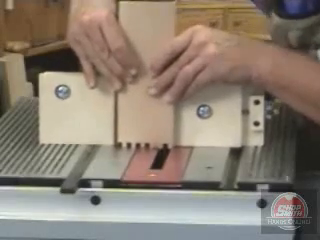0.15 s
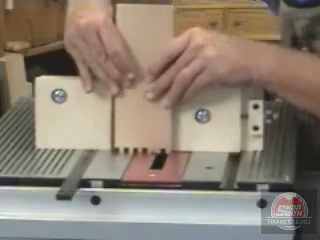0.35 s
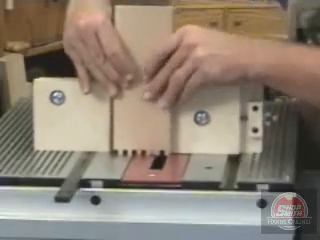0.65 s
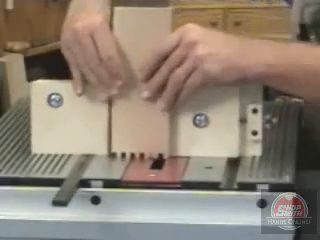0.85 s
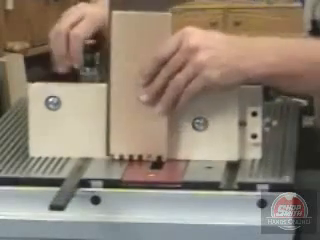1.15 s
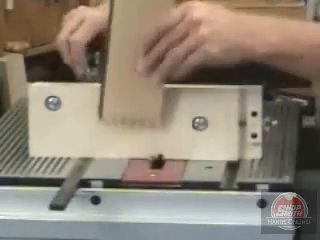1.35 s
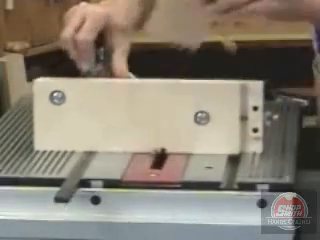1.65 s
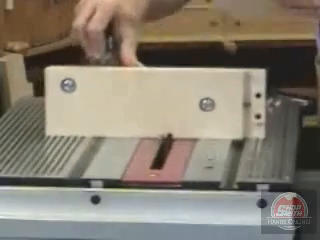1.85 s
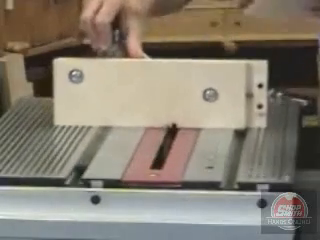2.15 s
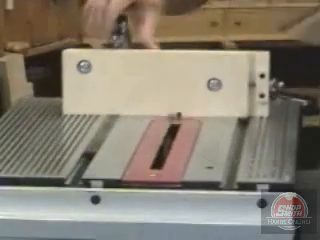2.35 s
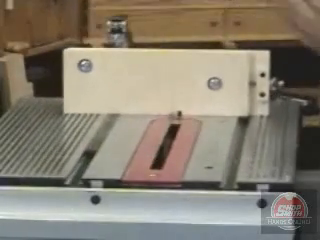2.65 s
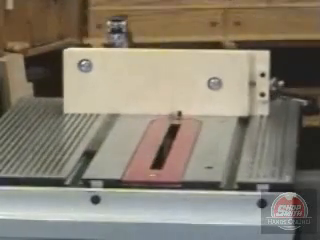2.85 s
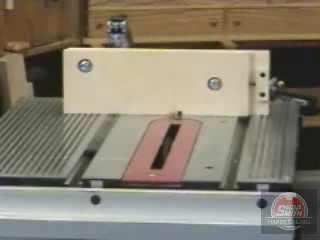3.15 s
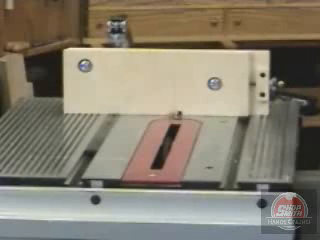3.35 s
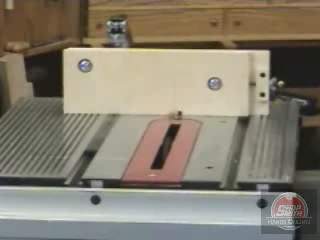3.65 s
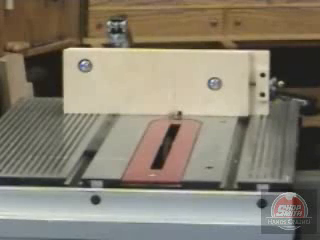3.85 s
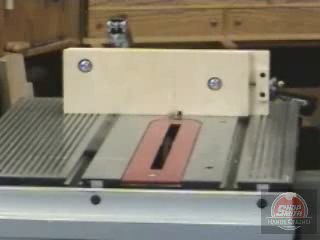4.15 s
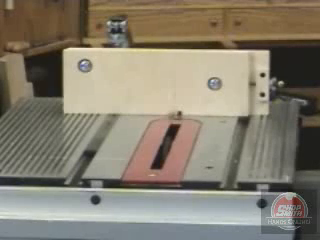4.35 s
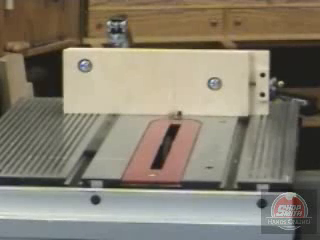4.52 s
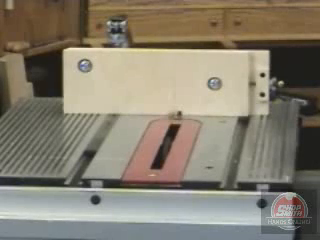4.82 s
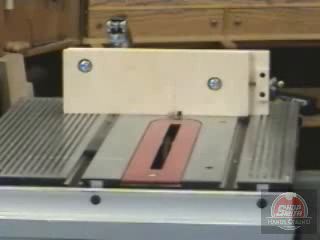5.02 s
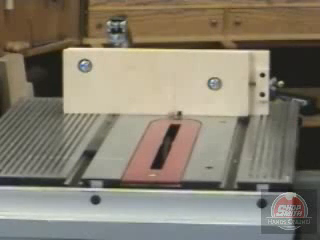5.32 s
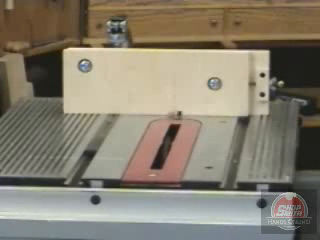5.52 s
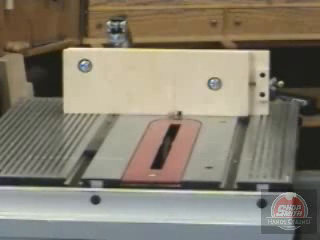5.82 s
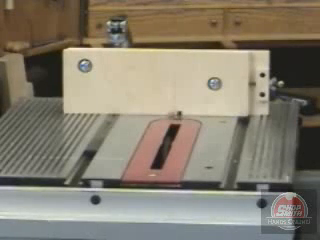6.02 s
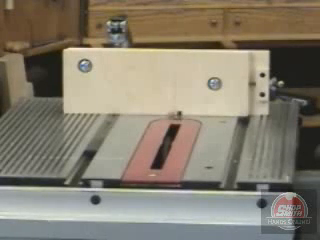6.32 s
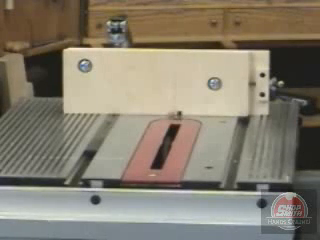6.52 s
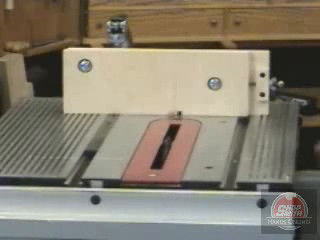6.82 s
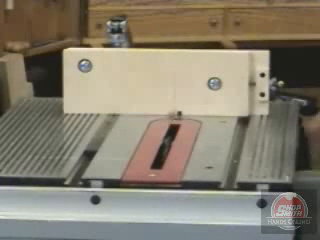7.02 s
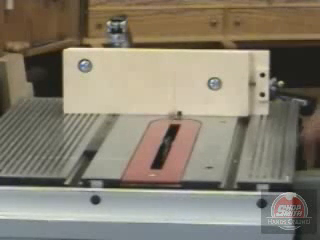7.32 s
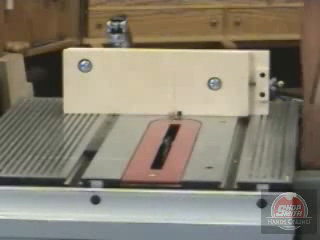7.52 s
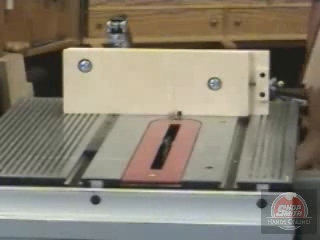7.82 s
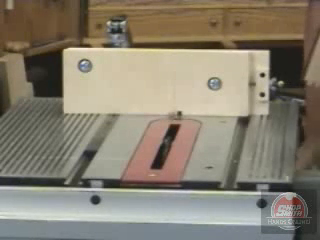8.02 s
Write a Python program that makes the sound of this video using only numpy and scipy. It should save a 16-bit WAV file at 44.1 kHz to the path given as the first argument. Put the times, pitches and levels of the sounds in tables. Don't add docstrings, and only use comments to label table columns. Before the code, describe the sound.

A table saw finishes a cut with a raspy hiss, wood knocks twice, then the blade whine sinks and rattles over a dust extractor's steady hum.

```python
import sys
import numpy as np
from scipy import signal
from scipy.io import wavfile
from scipy.ndimage import uniform_filter1d

SR = 44100
rng = np.random.default_rng(int(sys.argv[2]) if len(sys.argv) > 2 else 0)


def amplitude_ratio(level_db):
    exponent = np.asarray(level_db, float) / 20
    return 10 ** exponent


def store_pcm(level_fs):
    pcm = np.round(np.clip(level_fs, -1, 1) * 32767).astype(np.int16)
    wavfile.write(sys.argv[1], SR, np.atleast_2d(pcm).T)


N = 360297
HZ = np.fft.rfftfreq(2048, 1 / SR)
FRAMES = np.arange(N // 512 + 5) * 512 / SR

SHAFT_HZ = 59.16
EXTRACTOR_DB = -22.5
VANE_WAVER_DB = 2.5
# frequency in Hz, density in dB per Hz.
ROAR_COLOUR = [(35, -47.5), (60, -13), (184, -13), (239, -16), (281, -14.5), (522, -5), (749, -9.5),
               (1030, -15), (1120, -11.5), (1540, -16), (2640, -34.5), (4280, -56.5), (5330, -56),
               (7200, -53), (9360, -92), (15800, -120)]
# shaft order, level in dB.
SHAFT_HUM = [(1, -51), (2, -39.5), (3, -39.5), (4, -30.5), (5, -44.5), (7, -39), (16, -46.5)]
# centre in Hz, width in Hz, level in dB.
DUCT_MODES = [(192, 42, -43), (372.6, 43, -33), (467.1, 32, -34.5), (525, 34, -35), (605.7, 18, -36),
              (1036, 90, -37)]
# time in seconds, level in dB.
VANE_LOAD = [(0, -29.5), (.8, -34), (1.9, -38.5), (2.3, -28.5), (4.9, -28), (5.3, -36), (5.7, -28),
             (6.7, -29.5), (8.17, -53)]

RUMBLE_DB, LUMPS_DB = -54.5, 7

KNOCK_T60_S = .03
# time in seconds, peak in dB.
WOOD_TICKS = [
    (0.197, -59),
    (1.9554, -45),
    (6.795, -18),
]
# time in seconds, peak in dB, pitch in Hz.
WOOD_KNOCKS = [
    (.197, -10, 900),
    (1.9575, -7, 650),
]
# start in seconds, length in seconds, level in dB.
RUBBING = [
    (4.705, 0.19, -32.5),
    (4.896, 0.11, -39),
    (5.169, 0.32, -37.5),
    (5.5, .2, -43.5),
    (6.043, .22, -45),
]
# time in seconds, peak in dB, pitch in Hz.
RATTLES = [(4.7168, -24, 2530), (4.7386, -15.5, 2840), (4.7587, -44, 2920), (4.789, -21.5, 2900),
           (4.8143, -21, 2930), (4.8394, -38, 2480), (4.8698, -39, 3100), (4.9286, -21.5, 2830),
           (4.9646, -31.5, 2550), (4.9912, -25, 2820), (5.1907, -24, 2710), (5.214, -37.5, 2390),
           (5.2729, -19.5, 2580), (5.2888, -35, 2690), (5.319, -23.5, 2860), (5.3344, -36, 2420),
           (5.376, -26, 3080), (5.4125, -29, 3030), (5.5727, -37, 3020), (5.7718, -44, 2500),
           (6.0604, -35, 2920), (6.1194, -45, 2980), (6.1644, -31.5, 2840), (6.2143, -37, 2440)]

CUT_PEAK_S, CUT_END_S = .09, 0.22
TOOTH_HZ, OFF_S, COAST_S = 1163.5, 3.22, 2.3
IMBALANCE_DB, IMBALANCE_SAG_DB_PER_S, IMBALANCE_END_S = -29, 2.5, 2.7
# time in seconds, level in dB.
TOOTH_WHINE = [(0, -27), (.9, -31), (1.2, -48), (2.2, -42.5), (2.5, -34.5), (3.25, -26), (3.8, -31),
               (4.0, -44), (5, -56)]
# frequency in Hz, density in dB per Hz.
BLADE_COLOUR = [(150, -38.5), (250, -4), (260, -24.5), (286, 1), (328, -5), (380, -6), (441, -3),
                (518, 0.5), (889, -6.5), (1130, -5), (1230, -7), (2520, -14.5), (4090, -21.5),
                (5430, -26.5), (6300, -35.5), (8190, -67), (13900, -120)]
# lower edge in Hz, upper edge in Hz.
REGION_EDGES = [(300, 750), (800, 1300), (1400, 2000), (2100, 2900), (3100, 4400), (4600, 6400)]
# idle level in dB, share of the wind, lift while cutting in dB,
# fade of that lift in seconds, share of the slides.
REGION_MOVES = [
    (-19, .55, 1.7, .3, 0.11),
    (-18, 0.95, 2.5, 0.37, 0.13),
    (-21.5, 1.0, 5.5, 0.55, -0.2),
    (-27, 0.97, 7, 0.45, 0.2),
    (-37.5, 0.9, 11, 0.042, 0.7),
    (-47, 0.72, 6.5, 0.12, 1.16),
]
# time in seconds, level in dB relative to idling.
BLADE_WIND = [(0, -0.5), (2.3, 0), (2.6, 1.5), (3.5, 0), (4.0, -1), (5.2, -9.5), (6.2, -14.5),
              (8.17, -17.5)]
# start in seconds, length in seconds, level in dB.
SLED_SLIDES = [
    (0.552, 1.8, 7),
    (2.396, .5, -2.5),
    (3.406, .45, 4),
    (3.898, .7, 2),
]

LOUD_DB, QUIET_DB = -16, -21
EDGE_LOUD_DB, EDGE_QUIET_DB, EDGE_JUMP_DB = -63, -73.5, 3.5
TOP_DB = -77.5
FILL_DB = -14
REFILL = .85
# lower edge in Hz, upper edge in Hz, step over band level in dB when loud,
# the same when quiet, spread of the step in dB, level jumps in dB, least loudness relative to the whole in dB.
TRACK_BANDS = [(0, 52, -2, -6, 2, 0, -35), (52, 95, 1, -6, 3, 0, -28), (1500, 2000, 1, 6, 3, 0, -60),
               (2000, 2700, 4, 8, 3, 1, -60), (2700, 3150, 6, 5, 3, 2, -60),
               (3150, 3700, 9, 11.5, 2.5, 1.8, -60), (3700, 4400, 10, 12, 2.5, 1.8, -60),
               (4400, 5300, 10, 10, 3, 1.8, -60), (5300, 6050, 6, 5, 3, 1.8, -60),
               (6050, 6400, 5, 3, 5, 2.5, -60), (6400, 7300, 4, -6, 3, 0, -48.5),
               (7300, 8000, 12, 14.5, 2, 0, -90)]
# frequency in Hz, level in dB.
MIRROR = [(8000, -0.5), (9000, -4.5), (9950, -13)]
# start in seconds, length in seconds, level in dB.
BASS_LULLS = [(.12, .78, -12), (1.02, .06, -6), (1.6, .2, -10), (1.88, 0.11, -12), (2.25, .28, -12),
              (2.658, .12, -7), (2.92, .56, -13), (3.97, 0.12, -15), (4.305, .2, -4), (6.482, .06, -3)]
# start in seconds, length in seconds, level in dB.
EDGE_STARVED = [(0.076, 0.45, -12), (0.732, 0.22, -6), (1.136, 0.14, -18), (1.398, .15, -25),
                (1.657, 0.062, -15), (1.865, 0.46, -22.5), (2.585, 0.076, -16), (2.99, .22, -7),
                (3.44, 0.064, -25), (3.58, .1, -12), (3.95, 0.21, -15)]
# time in seconds, peak in dB.
STRAY_CHIRPS = [(0.0842, -53), (0.2794, -64), (0.3744, -61), (0.5147, -59), (0.6064, -62), (0.6898, -60),
                (0.7454, -61), (0.7846, -61), (1.0244, -60), (1.1373, -55), (1.1644, -54), (1.3648, -56),
                (1.3994, -57), (1.4424, -54), (1.6601, -60), (1.7699, -64), (1.9094, -63), (2.0253, -49),
                (2.0557, -53), (2.0894, -54), (2.1344, -63), (2.1824, -56), (2.9294, -62), (3.4194, -63),
                (3.5344, -61), (3.6351, -66), (4.2133, -68), (4.8144, -74), (7.1442, -73), (7.6939, -76)]


def read(points, hz):
    f, value = np.transpose(points)
    return np.interp(np.log(hz + 1), np.log(f + 1), value)


def curve(rows):
    s, db = np.transpose(rows)
    return amplitude_ratio(np.interp(np.arange(N) / SR, s, db, left=-200, right=-200))


def spell(start, length, edge_s):
    t = np.arange(N) / SR
    return np.clip(np.minimum(t - start, start + length - t) / edge_s + .5, 0, 1)


def spells(rows, edge_s):
    return sum(db * spell(s, length, edge_s) for s, length, db in rows)


def evened(x):
    return x / np.sqrt(np.mean(x ** 2) + 1e-20)


def drift(rate):
    grit = uniform_filter1d(rng.standard_normal(N), size=400)
    return evened(signal.lfilter([1], [1, -np.exp(-2 * np.pi * rate / SR)], grit))


def resonate(x, hz, width):
    turn = np.exp(2j * np.pi * np.cumsum(hz * np.ones(len(x))) / SR)
    r = np.exp(-np.pi * width / SR)
    return 2 * (turn * signal.lfilter([1 - r], [1, -r], x / turn)).real


def noise(db, patchy_db, flicker_db):
    a, b, patches = rng.standard_normal((len(FRAMES), len(HZ), 3)).T
    patches = uniform_filter1d(patches, size=18, axis=0)
    patches = evened(uniform_filter1d(patches, size=7, axis=1))
    flicker = evened(uniform_filter1d(rng.standard_normal(len(FRAMES)), size=3))
    flicker = np.outer(np.clip((HZ - 2500) / 1500, 0, 1), flicker)
    gain = amplitude_ratio(db + patchy_db * patches + flicker_db * flicker)
    z = (a + 1j * b) * gain * np.sqrt(SR / 2048)
    return signal.istft(z, nperseg=2048, noverlap=1536)[1][:N] * .87


def rumble():
    floor = resonate(resonate(rng.standard_normal(N), 35, 30), 35, 30)
    return amplitude_ratio(RUMBLE_DB + LUMPS_DB * drift(8.7)) * evened(floor)


def extractor():
    turns = 2 * np.pi * SHAFT_HZ * np.arange(N) / SR
    hum = np.zeros(N)
    for order, db in SHAFT_HUM:
        tone = np.sin(round(order) * turns + 2 * np.pi * rng.random())
        hum += np.sqrt(2) * amplitude_ratio(db + 1.54 * drift(6.9)) * tone
    vanes = np.sin(8 * turns + 0.68 * drift(4.1))
    hum += np.sqrt(2) * curve(VANE_LOAD) * amplitude_ratio(VANE_WAVER_DB * drift(3)) * vanes
    air = noise(read(ROAR_COLOUR, HZ)[:, None], patchy_db=1.0, flicker_db=0)
    roar = amplitude_ratio(EXTRACTOR_DB - 4.5) * evened(air)
    ducts = np.zeros(N)
    for hz, width, db in DUCT_MODES:
        ducts += amplitude_ratio(db) * evened(resonate(resonate(rng.standard_normal(N), hz, width), hz, width))
    return hum + roar + ducts


def ticks():
    out = np.zeros(N)
    for s, db in WOOD_TICKS:
        out[round(s * SR)] = amplitude_ratio(db - 4)
    return np.convolve(out, signal.firwin(101, [6300, 9800], pass_zero=False, fs=SR), "same")


def knocks():
    out, t = np.zeros(N), np.arange(3000) / SR
    for s, db, hz in WOOD_KNOCKS:
        modes = np.sin(2 * np.pi * hz * t) + .6 * np.sin(2 * np.pi * 1.7 * hz * t)
        out[round(s * SR):][:len(t)] += amplitude_ratio(db - 60 * t / KNOCK_T60_S) * modes
    return out


def rub():
    plate = resonate(resonate(rng.standard_normal(N), 2870, 600), 2870, 600)
    gain = sum(amplitude_ratio(db - 4) * spell(s, length, 0.034) for s, length, db in RUBBING)
    return gain * evened(plate * amplitude_ratio(4.1 * drift(22)))


def chatter():
    out, t = np.zeros(N + SR), np.arange(1200) / SR
    shape = (t / 0.0085 * np.exp(1 - t / 0.0062)) ** 2
    for s, db, hz in RATTLES:
        grit = rng.standard_normal(len(t))
        scrape = evened(resonate(resonate(grit, hz, 550), hz, 550))
        ring = np.sin(2 * np.pi * hz * t) + .9 * scrape
        out[round(s * SR):][:len(t)] += amplitude_ratio(db) * shape * ring
    return out[:N]


def whine():
    t = np.arange(N) / SR
    hz = TOOTH_HZ * np.exp(-np.maximum(t - OFF_S, 0) / COAST_S)
    fuzz = evened(resonate(rng.standard_normal(N), hz, 9))
    imbalance = amplitude_ratio(IMBALANCE_DB - IMBALANCE_SAG_DB_PER_S * t + 1.5 * drift(1.2))
    imbalance = imbalance * spell(-1, 1 + IMBALANCE_END_S, .2)
    return curve(TOOTH_WHINE) * fuzz + np.sqrt(2) * imbalance * np.sin(2 * np.pi * TOOTH_HZ / 3 * t)


def saw():
    wind_db = np.interp(FRAMES, *np.transpose(BLADE_WIND))
    since = np.maximum(np.maximum(FRAMES - CUT_END_S, CUT_PEAK_S - FRAMES), 0)
    slide_db = np.interp(FRAMES, np.arange(N) / SR, spells(SLED_SLIDES, .12))
    colour_db = read(BLADE_COLOUR, HZ)
    lift = []
    for (db, wind, cut_db, fade_s, slide), (lo, hi) in zip(REGION_MOVES, REGION_EDGES):
        inside = (HZ > lo) & (HZ < hi)
        colour_sum_db = 10 * np.log10(np.sum(amplitude_ratio(colour_db[inside]) ** 2) * HZ[1])
        moves_db = wind * wind_db + cut_db * np.exp(-since / fade_s) + slide * slide_db
        lift.append(db + moves_db - colour_sum_db)
    centres = np.sqrt(np.prod(REGION_EDGES, axis=1))
    lift_db = np.transpose([read(np.transpose([centres, row]), HZ) for row in np.transpose(lift)])
    return noise(colour_db[:, None] + lift_db - 1.0, patchy_db=0.97, flicker_db=1.03)


def scene():
    return (rumble() + extractor() + knocks() + rub() + chatter() + whine() + saw())[None]


def stray_chirps():
    out, t = np.zeros(N + SR), np.arange(2900) / SR
    for s, db in STRAY_CHIRPS:
        place, phase, weak = rng.random((3, 5))
        hz = np.array([10050, 10300, 10550, 11300, 11600]) + 300 * place
        gain = amplitude_ratio(db + np.array([-8, -1.0, -4.5, -13, -16]) - 13 * weak ** 2)
        lines = gain @ np.sin(2 * np.pi * (np.outer(hz, t) + phase[:, None]))
        out[round(s * SR) - 400:][:len(t)] += np.hanning(len(t)) * lines
    return out[:N]


def camera_track(x):
    hop, half, top = 1411, 512, 642
    n, k = np.arange(2 * hop), np.arange(top)
    window = np.sin(np.pi * (n + .5) / (2 * hop))[:, None]
    basis = window * np.cos(np.pi / hop * np.outer(n + .5 + hop / 2, k + .5)) * np.sqrt(2 / hop)
    padded = np.pad(x, (hop, 2 * hop - N % hop), "reflect")
    c = np.lib.stride_tricks.sliding_window_view(padded, 2 * hop)[::hop] @ basis[:, :half]
    hz, frame = (k + .5) * SR / (2 * hop), np.arange(len(c))
    low_hz = hz[:half]
    at = np.minimum(frame * hop, N - 1)
    frame_db = uniform_filter1d(10 * np.log10(np.sum(c ** 2, axis=1) / hop), size=9)
    luck, jumps, thin = rng.standard_normal((len(c), len(TRACK_BANDS), 3)).T
    fill = rng.standard_normal(c.shape)
    held = fill[frame // 2 * 2]

    edge, last = (low_hz >= 6400) & (low_hz < 7300), low_hz >= 7300
    edge_db = np.interp(frame_db, [QUIET_DB, LOUD_DB - 3], [EDGE_QUIET_DB, EDGE_LOUD_DB])
    edge_db = edge_db + EDGE_JUMP_DB * held[:, 0] + spells(EDGE_STARVED, 0.033)[at]
    c[:, edge] = fill[:, edge] * amplitude_ratio(edge_db)[:, None] * np.sqrt(hop / 45)
    last_db = TOP_DB + .5 * (frame_db[:, None] - LOUD_DB)
    c[:, last] = held[:, last] * amplitude_ratio(last_db) * np.sqrt(hop / 45)

    for (lo, hi, loud, quiet, spread, jump_db, least_db), chance, jump, gap in zip(TRACK_BANDS, luck, jumps, thin):
        band = (low_hz >= lo) & (low_hz < hi)
        middle = 100 < hi < 6100
        least = amplitude_ratio(frame_db + least_db) * np.sqrt(hop / band.sum())
        level = np.maximum(np.sqrt(np.mean(c[:, band] ** 2, axis=1)), least)
        step_db = np.interp(frame_db, [QUIET_DB, LOUD_DB], [loud, quiet][::-1]) + spread * chance
        step = (level * amplitude_ratio(step_db))[:, None]
        kept = step * np.round(c[:, band] / step)
        filler = fill[:, band] * (level * amplitude_ratio(FILL_DB + 3 * gap))[:, None] * middle
        kept = np.where(kept == 0, filler, kept)
        kept_level = np.sqrt(np.mean(kept ** 2, axis=1)) + 1e-12
        restored = np.clip(level / kept_level, 0, 4) ** (REFILL * middle)
        c[:, band] = kept * (restored * amplitude_ratio(jump_db * jump))[:, None]

    c[:, :6] *= amplitude_ratio(spells(BASS_LULLS, .04)[at])[:, None]
    flutter = evened(np.diff(rng.standard_normal(len(c) + 1)))
    c[:, low_hz > 3150] *= amplitude_ratio(1.8 * flutter)[:, None]
    mirror = np.where(last, np.roll(c, 7, axis=0), c)[:, ::-1][:, :top - half]
    c = np.hstack([c, mirror * amplitude_ratio(read(MIRROR, hz[half:]))])
    pulse = 1 - .08 * np.cos(2 * np.pi * n / hop)
    treble = hz >= 3150
    frames = (c * ~treble) @ basis.T + (c * treble) @ basis.T * pulse
    return (frames[1:, :hop] + frames[:-1, hop:]).ravel()[:N]


def roll_off(x):
    return signal.sosfilt(signal.butter(12, 12030, fs=SR, output="sos"), x)


def record(dry):
    capsule = dry[0] + 1.3 * resonate(dry[0], 5400, 260)
    soft = .85 * np.tanh(capsule / .85)
    n = np.arange(N)
    fade = np.minimum(np.minimum(n, N + 8 - n) / 60, 1)
    mix = fade * camera_track(soft) + ticks() + stray_chirps()
    return roll_off(mix[None])


dry = scene()
out = record(dry)
store_pcm(out)
```